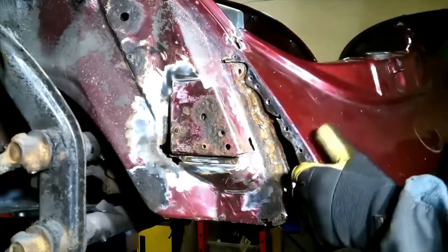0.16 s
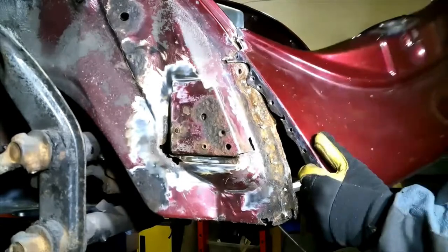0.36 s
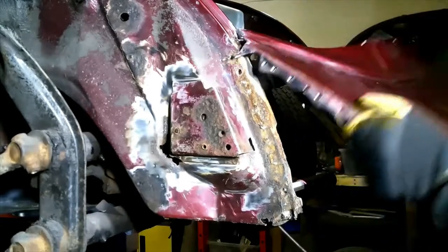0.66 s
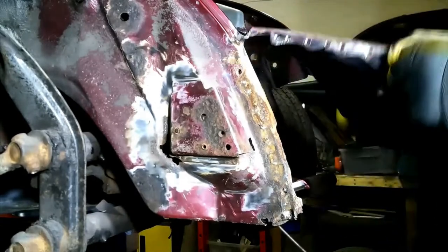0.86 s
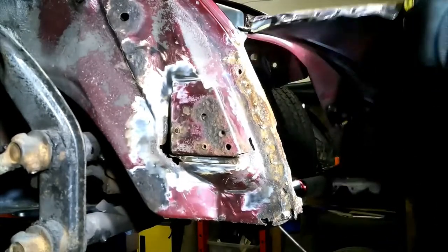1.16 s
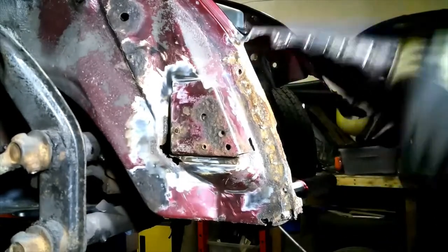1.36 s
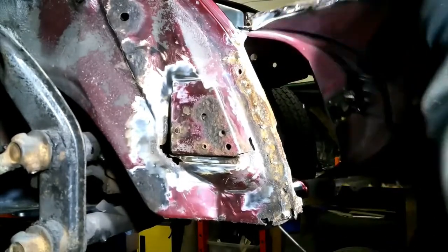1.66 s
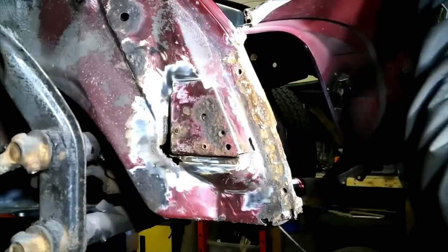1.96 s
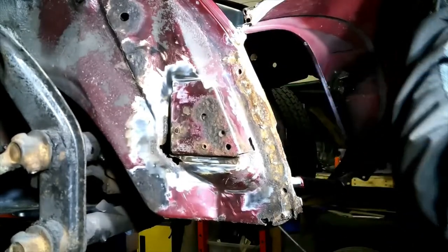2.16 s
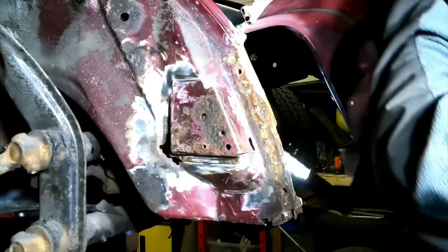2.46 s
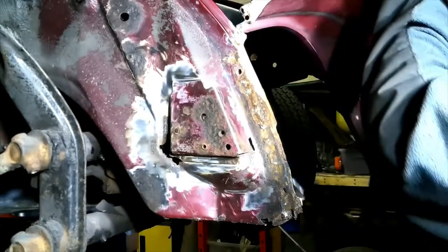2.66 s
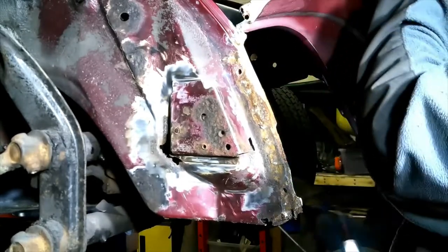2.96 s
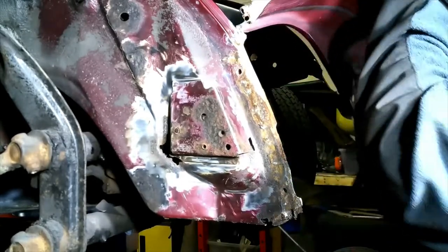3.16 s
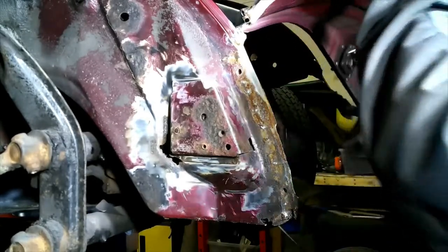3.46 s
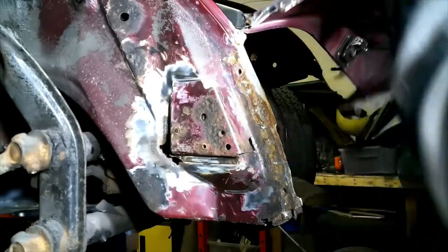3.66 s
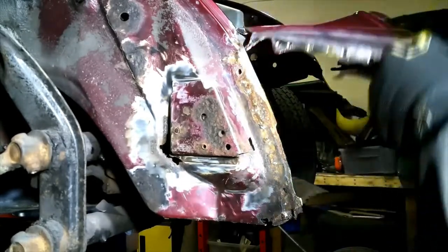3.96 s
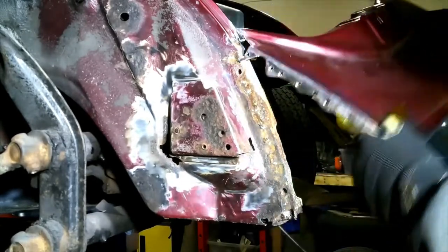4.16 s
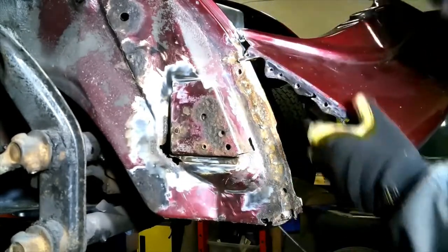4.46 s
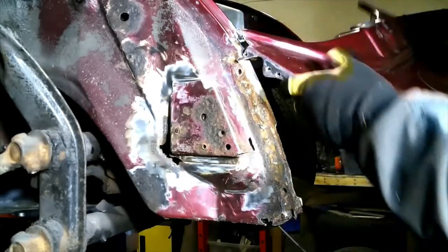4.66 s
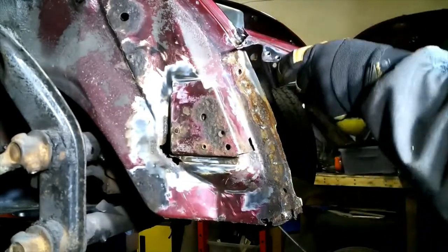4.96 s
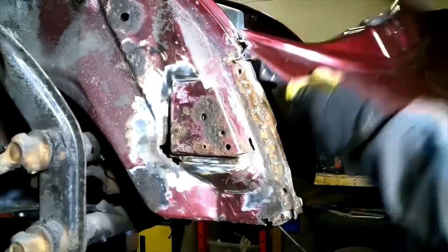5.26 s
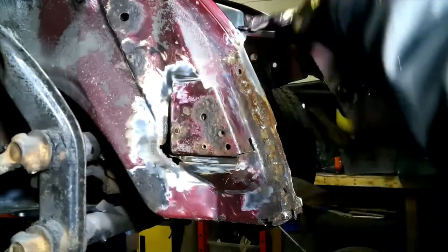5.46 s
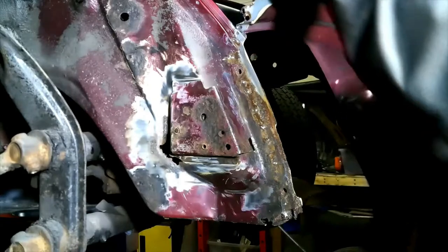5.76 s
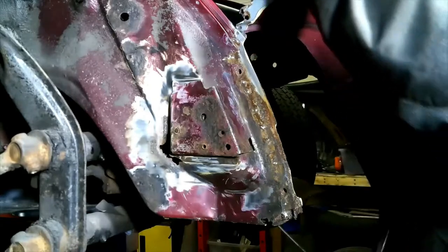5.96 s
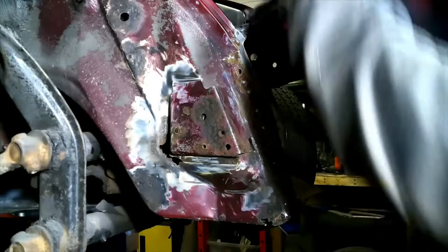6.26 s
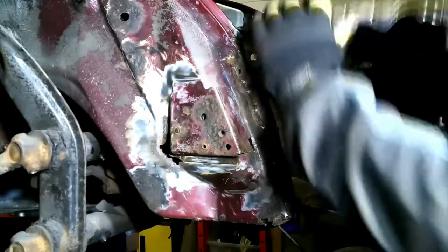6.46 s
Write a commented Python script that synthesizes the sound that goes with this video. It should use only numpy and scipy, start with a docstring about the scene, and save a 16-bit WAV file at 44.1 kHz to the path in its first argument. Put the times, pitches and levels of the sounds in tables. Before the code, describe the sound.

A loose steel car panel is bent back and forth in a workshop, heard close. Dull hollow clunks and crinkles come first, then a brief harsh creak and squeal, a bright tearing crunch, and a very sharp double crack. Afterwards only weak creases, ticks and soft glove rubbing remain over faint still air.

```python
"""Rusty steel wing wrenched loose

A rusty steel wing, still attached at one corner, is wrenched back and forth by hand in a workshop.
Buckles are filtered rings of the panel: dull clunks and sharp snaps with bright grit and a pair of notes.
Crinkling, rubbing and the bright crunch of ripping are streams of tiny clicks sent through the panel;
the seam creaks as slips kick resonators, edges squeak as wavering sines, and short low noise thuds
sit under a few loud snaps. Quiet coloured noise is the air behind it all."""
import sys
import numpy as np
from scipy import signal
from scipy.fft import rfft, irfft
from scipy.io import wavfile
from scipy.ndimage import uniform_filter1d, minimum_filter1d

SR = 44100
rng = np.random.default_rng(int(sys.argv[2]) if len(sys.argv) > 2 else 0)


def store_pcm(level_fs):
    """Save levels as 16-bit WAV."""
    pcm = np.round(np.clip(level_fs, -1, 1) * 32767).astype(np.int16)
    wavfile.write(sys.argv[1], SR, np.atleast_2d(pcm).T)


N = 291942   # length of the scene in samples
RING_SAMPLES = 32768   # length of one ring

# relative colour of the still workshop air: [f/Hz, density/dB per Hz]
AIR_COLOUR = [(25, 9), (70, -3), (200, -10.5), (1000, -14.5), (3000, -25.5), (6000, -35), (15000, -36)]
# ring time of panel and workshop together: [f/Hz, t60/s]
RING_TIMES = [(100, 0.88), (260, 0.47), (700, 0.39), (1800, 0.39), (4800, 0.42), (12800, 0.28)]
# strongest modes of the whole panel, before trim, colour and random spread: [f/Hz, level/dB]
PANEL_MODES = [(118, -36), (312, -25), (373, -20.5), (454, -20), (856, -26.5), (1029, -25), (1120, -24),
               (1300, -21.5), (1604, -34), (1964, -26.5), (2526, -30), (2902, -28.5), (3230, -35.5),
               (3339, -31), (4262, -25.5), (4478, -20.5), (5008, -21.5)]
# glove and steel sliding over each other, before trim: [t/s at full level, length/s, level/dB]
SLIDES = [(0.69, 0.59, -36), (5.62, 0.049, -34), (5.76, 0.28, -40.5), (6.11, 0.15, -48.5),
          (6.38, 0.036, -58.5), (6.55, 0.061, -56.5)]
# colour of the sliding: [f/Hz, level/dB]
SLIDE_COLOUR = [(150, -17), (350, -2), (800, 1), (1300, -1.5), (2200, -5.5), (3200, -20.5), (6000, -39.5),
                (14000, -51)]
# steel edges rubbing into brief tones: [start t/s, length/s, f/Hz, level/dB, pitch waver as a share]
SQUEAKS = [(0.01, 0.08, 466, -30.5, 0.031), (2.687, 0.045, 2450, -16, 0.04),
           (2.701, 0.035, 3940, -24.5, 0.0054), (2.702, 0.093, 453, -23.5, 0.022),
           (2.704, 0.045, 1170, -14.5, 0.027), (2.736, 0.072, 377, -33, 0.024),
           (2.745, 0.035, 5060, -40, 0.0037), (2.75, 0.026, 1065, -9.5, .05), (3.023, 0.05, 1097, -54, .01),
           (4.442, 0.012, 4720, -27, 0.063), (4.44, 0.025, 2570, -43, 0.045),
           (4.44, 0.012, 7820, -37.5, 0.025), (4.769, 0.012, 4790, -55.5, 0.034),
           (5.117, 0.051, 1753, -31.5, 0.077), (6.119, 0.2, 576, -61.5, 0.15),
           (6.282, 0.15, 798, -69, 0.17)]
# loudness of the sticking and slipping seam, before trim: [t/s, level/dB]
CREAK_LEVEL = [(2.68, -46.5), (2.703, -28.5), (2.709, -11.5), (2.733, -17), (2.741, -4.5), (2.75, -25),
               (2.768, -2.5), (2.774, -37.5)]
# resonances of the creaking seam: [f/Hz, width/Hz, level/dB]
SEAM_MODES = [(444, 22, -10), (885, 60, -3), (1165, 130, 0.5), (1560, 110, -5), (1930, 65, -5.5),
              (2400, 97, -5.5), (5100, 50, -20.5)]
# short low thuds under loud snaps: [t/s, level/dB before the decay]
LOW_THUDS = [(3.587, -39), (4.186, -30), (4.195, -22.5)]
# pushes that bend the sheet and make it crinkle, before trim: [t/s at full level, length/s, level/dB]
BENDS = [(0.0, 0.0017, -7), (0.3, 0.15, -34), (0.435, 0.064, -9), (1.63, 0.082, -6), (2.5, 0.25, -23.5),
         (2.71, 0.089, -6), (3.82, 0.019, -26.5), (4.3, 0.15, -26.5), (4.59, 0.065, -38), (5.16, 0.1, -17),
         (5.33, 0.17, -30.5), (5.615, 0.084, -35), (6.01, 0.2, -49)]
# colour of the dull crinkling: [f/Hz, level/dB]
BEND_COLOUR = [(25, -41.5), (50, -23), (85, -17.5), (118, -2.5), (160, -13.5), (300, 0.5), (480, -5.5),
               (680, -8), (1100, -5.5), (2500, -15), (6000, -25.5), (14000, -33)]
# runs of the crack along the seam: [t/s at full level, length/s, level/dB]
RIPS = [(1.64, 0.088, -19.5), (2.688, 0.012, -8.5), (2.732, 0.0073, -13.5), (2.783, 0.052, -12),
        (3.335, 0.097, 8), (3.425, 0.062, 3), (3.51, 0.14, -13.5), (4.197, 0.18, -9), (4.65, 0.076, -45)]
# colour of the bright crackle of a rip: [f/Hz, level/dB]
RIP_COLOUR = [(60, -34), (350, -36.5), (700, -13.5), (1400, -3.5), (4500, -1.5), (7000, -11.5),
              (14000, -22)]
# sudden buckles and cracks: [t/s, level/dB, low corner f/Hz, high corner f/Hz,
# bright grit level/dB relative to the snap, f/Hz of the buckled patch's upper note]
BUCKLES = [(0.001, -14.5, 295, 655, -25.5, 466), (0.289, -40, 160, 2740, -36, 1911),
           (1.044, -15, 159.3, 3013, -30, 1032), (1.073, -9.5, 172.6, 2450, -16.5, 1277),
           (1.257, -8, 208, 2235, -26.5, 797), (1.274, -5, 238.2, 1200, -22, 715),
           (1.559, -31, 190, 3010, -42, 860), (1.615, -1, 211.4, 3620, -21.5, 1023),
           (1.875, -5.5, 330, 1670, -21.5, 1251), (1.905, -11, 388, 2330, -25.5, 1087),
           (2.496, -28.5, 119.3, 1290, -30, 451), (2.547, -33, 120, 4350, -9, 358),
           (2.611, -28, 156.5, 5410, -30.5, 2505), (2.672, -12.5, 150, 1780, -5, 1980),
           (2.71, -4.5, 688, 1880, -1.5, 1151), (2.769, -7, 269.3, 2790, -7, 2340),
           (2.95, -27, 401, 14060, -20.5, 2710), (3.333, -2, 1000, 4220, -26, 3350),
           (3.586, -7, 570, 7520, -2.5, 3920), (3.85, -29.5, 533.4, 2300, -18, 996),
           (3.945, -29.5, 370, 1830, -8.5, 798), (3.982, -15, 564.6, 2462, -11.5, 1850),
           (4.049, -19, 457, 1814, -19, 1623), (4.103, -22.5, 440, 1550, -2.5, 1137),
           (4.144, -18.5, 260, 2540, -21, 2440), (4.185, -2, 1000, 2420, -23, 2553),
           (4.191, 3, 2300, 4158, -37, 4260), (4.282, -14, 797, 4100, -32, 2540),
           (4.532, -38.5, 149.4, 1306, -16, 326), (4.634, -40.5, 240, 5190, -32, 2800),
           (4.771, -54, 190, 4380, -34, 4830), (5.12, -31.5, 110, 2176, -5, 1660),
           (5.251, -28.5, 141, 3100, -6.5, 1625), (5.385, -35.5, 418, 2980, -11.5, 857),
           (5.466, -43.5, 158.3, 2980, -0.5, 1422), (5.79, -46.5, 620, 3160, -28, 1517),
           (6.044, -43.5, 156.5, 3690, -31, 1502), (6.395, -69, 2000, 3853, -30.5, 2500)]


def from_db(db):
    """Decibels to gain."""
    return 10 ** (np.asarray(db) / 20)


def rms_one(x):
    """Scale to unit rms."""
    return x / np.sqrt(np.mean(x ** 2) + 1e-20)


def level_curve(rows):
    """Gain over time from (t/s, level/dB) rows; silent outside them."""
    rows = np.array(rows)
    return from_db(np.interp(np.arange(N) / SR, rows[:, 0], rows[:, -1], -np.inf, -np.inf))


def at_hz(points, hz):
    """Read a (f/Hz, value) table on a log-frequency axis."""
    points = np.array(points)
    return np.interp(np.log(np.maximum(hz, 1)), np.log(points[:, 0]), points[:, 1])


def cut(x, hz, kind, order):
    """Butterworth low- or high-pass."""
    edge = np.clip(hz, 10, .45 * SR)
    return signal.sosfilt(signal.butter(order, edge, kind, fs=SR, output="sos"), x)


def drift(rate_hz, size):
    """Slow random wander: straight lines between knots of spread 1."""
    knots = rng.standard_normal(int(size * rate_hz / SR) + 2)
    return np.interp(np.arange(size) * rate_hz / SR, np.arange(len(knots)), knots)


def add(out, s, sound):
    """Mix a sound in at time s."""
    start = int(np.clip(round(s * SR), 0, N - 1))
    out[start:start + len(sound)] += sound[:N - start]


def coloured(x, colour):
    """Shape a steady signal by a (f/Hz, level/dB) table."""
    gain = from_db(at_hz(colour, np.fft.rfftfreq(len(x), 1 / SR)))
    return irfft(rfft(x) * gain, len(x))


def fading(t60):
    """Exponential decay over the length of one ring."""
    return from_db(-60 * np.arange(RING_SAMPLES) / SR / max(t60, .01))


def note(hz, t60):
    """One decaying mode, starting up or down at random."""
    wave = np.sin(2 * np.pi * hz * np.arange(RING_SAMPLES) / SR)
    return rng.choice([-1, 1]) * wave * fading(t60)


def strokes(rows, rise_db_per_s, sag_db_per_s, fall_db_per_s):
    """Gain of (t/s, length/s, level/dB) strokes: each builds up to t, sags while it lasts, then dies."""
    t, gain = np.arange(N) / SR, np.zeros(N)
    for s, length_s, db in rows:
        age = t - s
        loss_db = rise_db_per_s * np.maximum(-age, 0)
        loss_db += sag_db_per_s * np.maximum(age, 0)
        loss_db += fall_db_per_s * np.maximum(age - length_s, 0)
        gain = np.maximum(gain, from_db(db - np.minimum(loss_db, 200)))
    return gain


def crackle(per_s, spread_db, clump_db):
    """Tiny clicks of uneven size and random sign that come in clumps; rms 1."""
    born = rng.random(N) < per_s / SR
    sizes = from_db(spread_db * np.minimum(rng.exponential(1, N), 4))
    signs = rng.choice([-1, 1], N)
    return rms_one(born * sizes * signs * from_db(clump_db * drift(90, size=N)))


def panel_ring(uneven_db, colour=((1, 0), (2, 0)), modes_trim_db=-2.5, cluster_hz=55):
    """Answer to one click: clusters of close modes, each band with its ring time, and a few that stand out."""
    hz = np.fft.rfftfreq(RING_SAMPLES, 1 / SR)
    # the place of the blow favours some clusters; they lie wider apart in the treble
    place = np.log1p(hz / 4000) * 4000 / cluster_hz
    favour = np.clip(rng.standard_normal(1024), -1.5, 1.5)
    clusters = rms_one(from_db(uneven_db * np.interp(place, np.arange(len(favour)), favour)))
    dense = rfft(coloured(rng.standard_normal(RING_SAMPLES), colour)) * clusters
    out = np.zeros(RING_SAMPLES)
    for centre, t60 in RING_TIMES:
        # overlapping bands, one around each row of the table
        share = at_hz([(f, f == centre) for f, _ in RING_TIMES], hz)
        out += irfft(dense * share) * fading(t60)
    for mode_hz, db in PANEL_MODES:
        strength_db = db + modes_trim_db + at_hz(colour, mode_hz) + 2 * rng.standard_normal()
        out += from_db(strength_db) * note(mode_hz, at_hz(RING_TIMES, mode_hz))
    return out


def through_panel(force, colour, uneven_db=1.0, moves_hz=22, count=5):
    """A running force wanders over several places on the panel, each with its own ring."""
    place = np.arange(N) * moves_hz / SR
    out = np.zeros(N)
    for k in range(count):
        distance = np.abs((place - k + count / 2) % count - count / 2)
        nearness = np.sqrt(np.maximum(1 - distance, 0))
        out += signal.fftconvolve(force * nearness, panel_ring(uneven_db, colour))[:N]
    # offset the energy of a mid-treble ring
    return out / np.linalg.norm(fading(at_hz(RING_TIMES, 2000)))


def workshop_air(level_db=-83):
    """Still air is steady noise, strongest in the bass."""
    return from_db(level_db) * rms_one(coloured(rng.standard_normal(N), AIR_COLOUR))


def rubbing(trim_db=-4.0):
    """A sliding grip scratches the sheet with fine, soft grains."""
    grip = strokes(SLIDES, rise_db_per_s=220, sag_db_per_s=48, fall_db_per_s=260)
    force = grip * crackle(per_s=2500, spread_db=1.0, clump_db=4.5)
    return from_db(trim_db) * through_panel(force, SLIDE_COLOUR)


def squeaks(rough_db=4.5, flutter=0.15):
    """Rubbing edges lock on to one wavering tone, which swells and stops; high ones flutter into a screech."""
    out = np.zeros(N)
    for s, length_s, hz, db, waver in SQUEAKS:
        size = int(length_s * SR)
        flutter_hz = flutter * hz
        pitch_hz = hz * (1 + waver * drift(flutter_hz, size=size))
        phase = 2 * np.pi * np.cumsum(pitch_hz) / SR
        # catches quickly, lets go slowly
        grip = np.sqrt(2) * np.sin(np.pi * np.linspace(0, 1, size) ** 0.45)
        swell = grip * from_db(db + rough_db * drift(flutter_hz, size=size))
        add(out, s, swell * np.sin(phase))
    return out


def creak(slips_per_s=246, slips_lost_per_s2=330, jitter=0.033, trim_db=4.0):
    """Each slip of the seam kicks its resonances, in an uneven buzz whose rate falls steadily."""
    start, end = CREAK_LEVEL[0][0], CREAK_LEVEL[-1][0]
    age = np.clip(np.arange(N) / SR, start, end) - start
    per_s = slips_per_s - slips_lost_per_s2 * age
    turns = np.cumsum(per_s * (1 + jitter * drift(150, size=N))) / SR
    # one click at each whole turn, of wandering strength
    slips = np.diff(np.floor(turns), prepend=0) * from_db(2 * drift(220, size=N))
    out = np.zeros(N)
    for hz, width_hz, db in SEAM_MODES:
        radius, angle = np.exp(-np.pi * width_hz / SR), 2 * np.pi * hz / SR
        feedback = [1, -2 * radius * np.cos(angle), radius * radius]
        out += from_db(db) * signal.lfilter([1 - radius, 0, radius - 1], feedback, slips)
    return from_db(trim_db) * level_curve(CREAK_LEVEL) * rms_one(out)


def ringing_friction(ring_db=-11.5):
    """Creak and squeaks are heard directly, and more softly through the panel's ring."""
    friction = creak() + squeaks()
    nearly_flat = ((1, 0.0046), (2, 0.0047))
    return friction + from_db(ring_db) * through_panel(friction, nearly_flat)


def low_thuds(thud_hz=330, thud_t60=0.075):
    """Short, low thuds under loud snaps: low-passed noise that dies fast."""
    out = np.zeros(N)
    for s, db in LOW_THUDS:
        thud = rms_one(cut(rng.standard_normal(RING_SAMPLES), thud_hz, "low", order=2))
        add(out, s, from_db(db) * thud * fading(thud_t60))
    return out


def crinkling(trim_db=-2.0):
    """The bending sheet gives way in many small dull steps."""
    bending = strokes(BENDS, rise_db_per_s=650, sag_db_per_s=63, fall_db_per_s=520)
    force = bending * crackle(per_s=900, spread_db=2.8, clump_db=3.0)
    return from_db(trim_db) * through_panel(force, BEND_COLOUR)


def ripping():
    """The crack starts abruptly as a dense stream of bright clicks, grows weaker while it lasts, and stops."""
    running = strokes(RIPS, rise_db_per_s=8200, sag_db_per_s=93, fall_db_per_s=670)
    force = running * crackle(per_s=1100, spread_db=3.0, clump_db=2.0)
    return through_panel(force, RIP_COLOUR)


def patch_notes(upper_hz, upper_db=-10.5, lower_db=-21, lower_ratio=0.68, bass_t60=.3):
    """A buckled patch rings with two notes of its own; rust damps high ones fast."""
    out = np.zeros(RING_SAMPLES)
    for hz, db in ((upper_hz, upper_db), (upper_hz * lower_ratio, lower_db)):
        out += from_db(db) * note(hz, bass_t60 / (1 + (hz / 2400) ** 2))
    return out


def snaps(uneven_db=7.5, direct=0.4, direct_s=0.012, grit_low_hz=900, grit_high_hz=5500, grit_rise_s=0.0013):
    """Each buckle strikes the panel: a wide patch gives a dull clunk, a breaking edge a bright snap."""
    out, t = np.zeros(N), np.arange(RING_SAMPLES) / SR
    attack = 1 + direct * np.exp(-t / direct_s)   # direct sound ahead of the room
    grit_onset = 1 - np.exp(-t / grit_rise_s)   # short rise softens the onset of the bright grit
    for s, db, low_hz, high_hz, grit_db, note_hz in BUCKLES:
        body = cut(panel_ring(uneven_db) * attack, low_hz, "high", order=3)
        body = cut(body, high_hz, "low", order=4)
        grit = cut(panel_ring(uneven_db) * grit_onset, grit_low_hz, "high", order=1)
        grit = cut(grit, grit_high_hz, "low", order=1)
        add(out, s, from_db(db) * (body + patch_notes(note_hz) + from_db(grit_db) * grit))
    return out


def scene():
    """Layer the workshop air, friction, low thuds, crinkling, ripping and snaps into one channel."""
    background = workshop_air() + rubbing() + ringing_friction()
    steel = low_thuds() + crinkling() + ripping() + snaps()
    return (background + steel)[None]


def record(dry, ceiling_db=-0.5, release_db_per_s=900, microphone_hz=13800, cutoff_hz=15600):
    """A fast limiter holds down the loudest peaks; the top rolls off and is cut."""
    over_db = np.maximum(20 * np.log10(np.abs(dry) + 1e-9) - ceiling_db, 0)
    # the running maximum against a ramp makes the gain recover at a steady rate
    ramp = release_db_per_s * np.arange(N) / SR
    gain_db = ramp - np.maximum.accumulate(over_db + ramp, axis=-1)
    gain_db = uniform_filter1d(minimum_filter1d(gain_db, size=15), size=15)
    dulled = cut(dry * from_db(gain_db), microphone_hz, "low", order=3)
    return signal.sosfilt(signal.ellip(10, .1, 80, cutoff_hz, fs=SR, output="sos"), dulled)


dry = scene()
out = record(dry)
store_pcm(out)
```